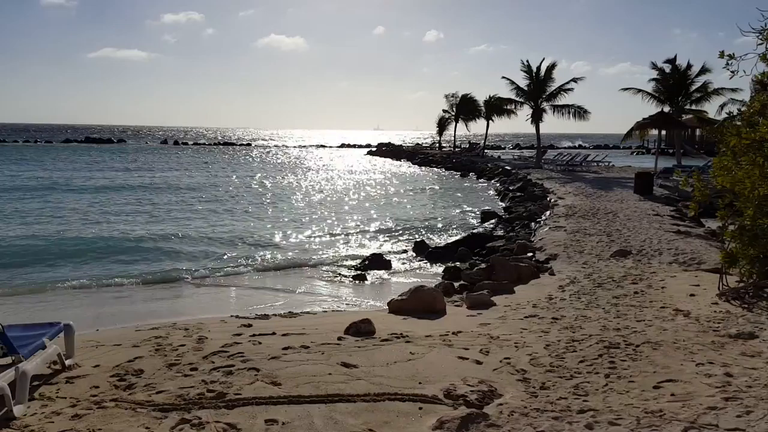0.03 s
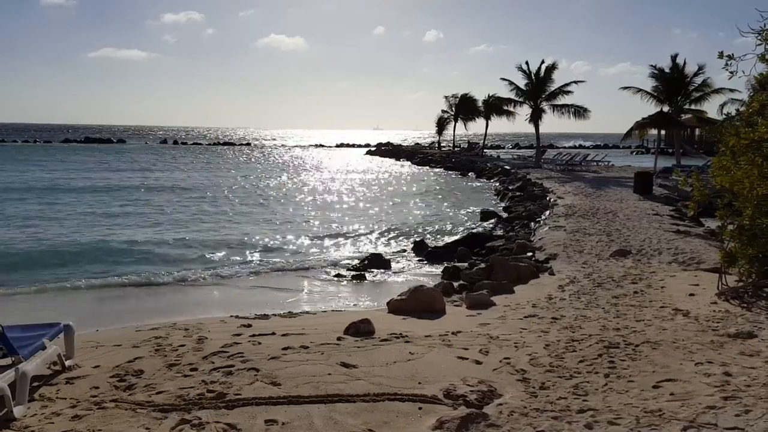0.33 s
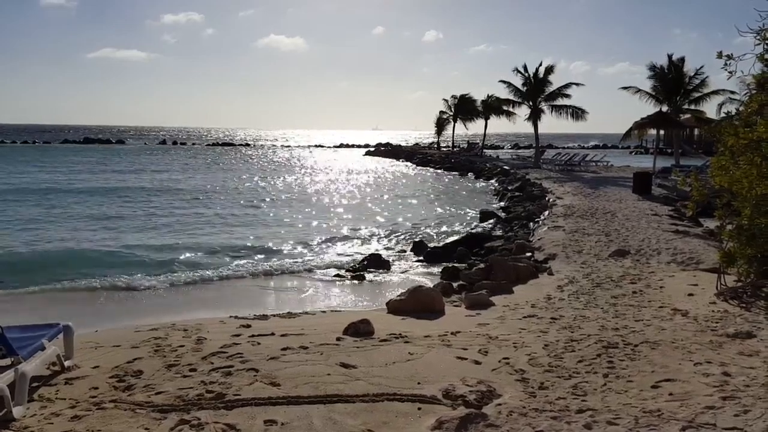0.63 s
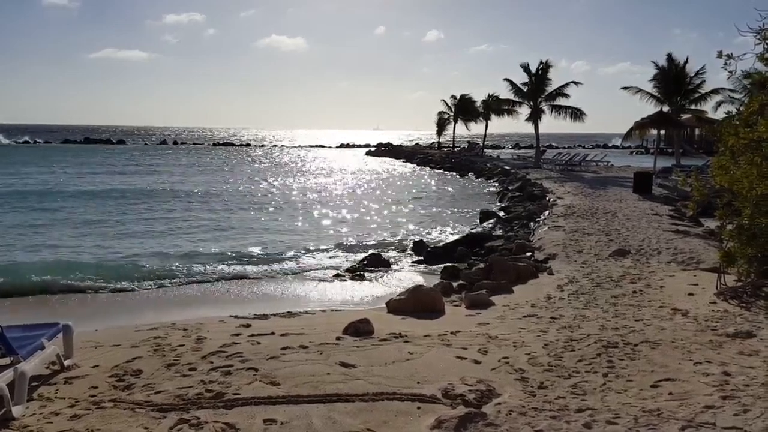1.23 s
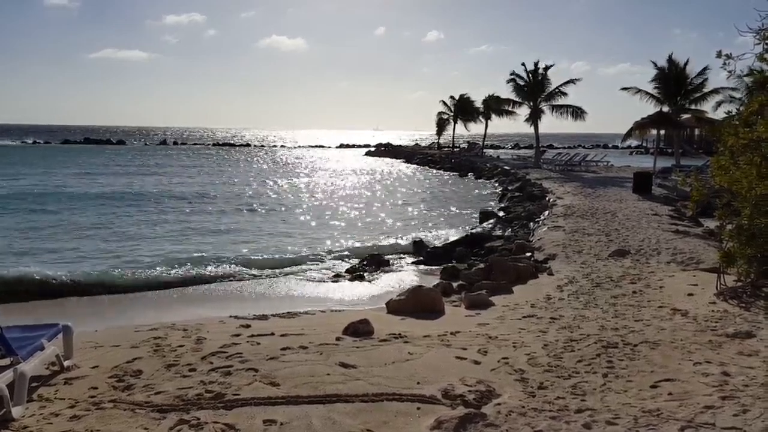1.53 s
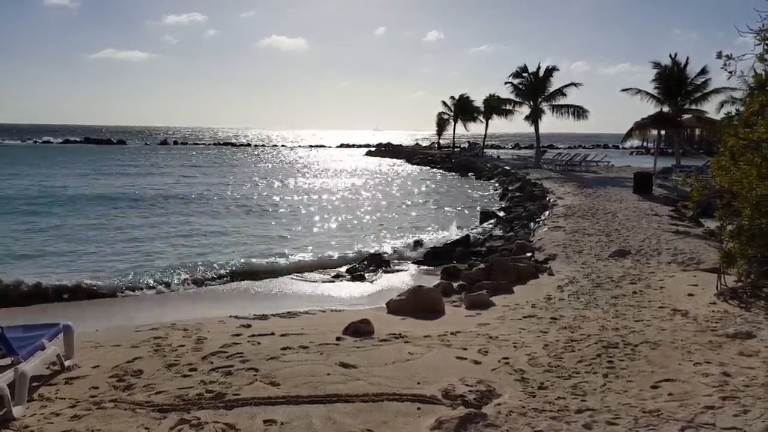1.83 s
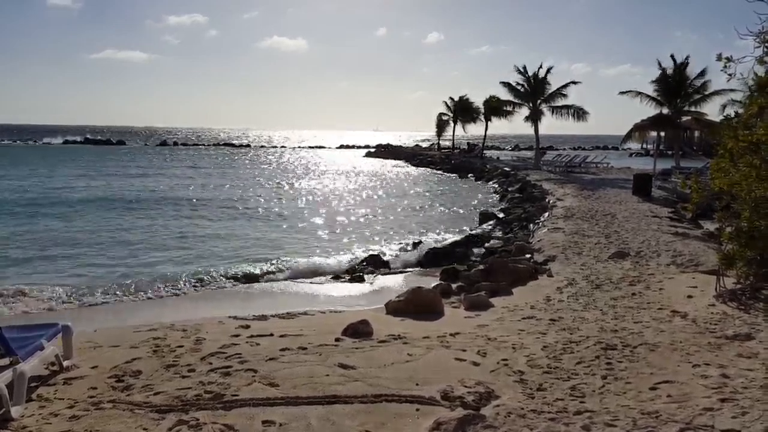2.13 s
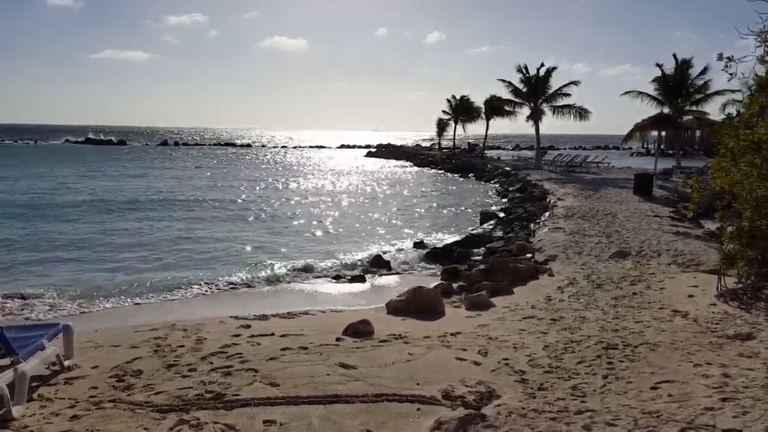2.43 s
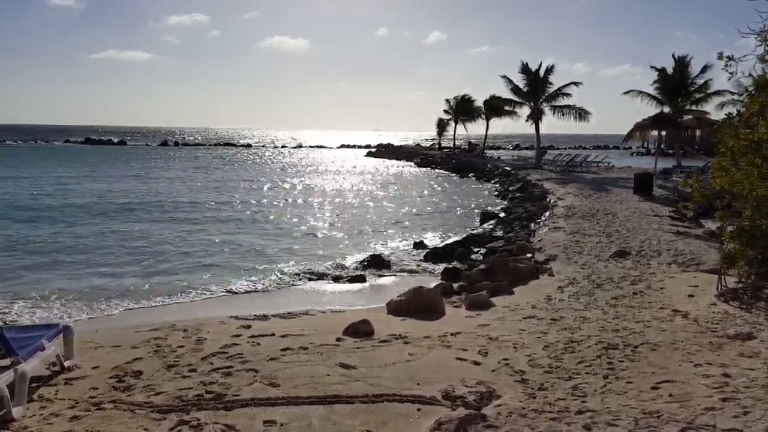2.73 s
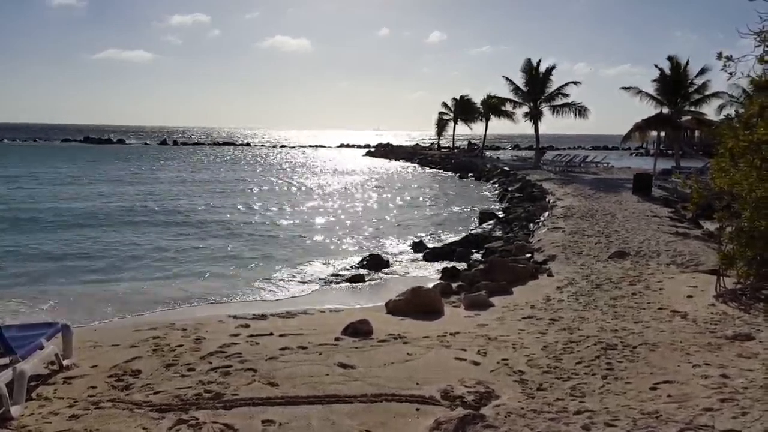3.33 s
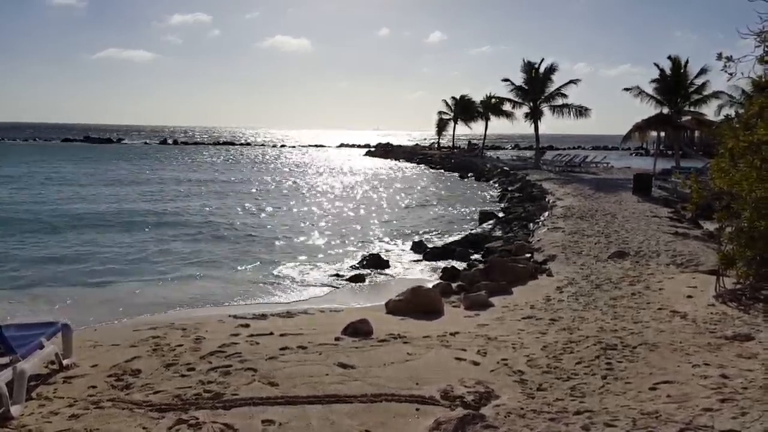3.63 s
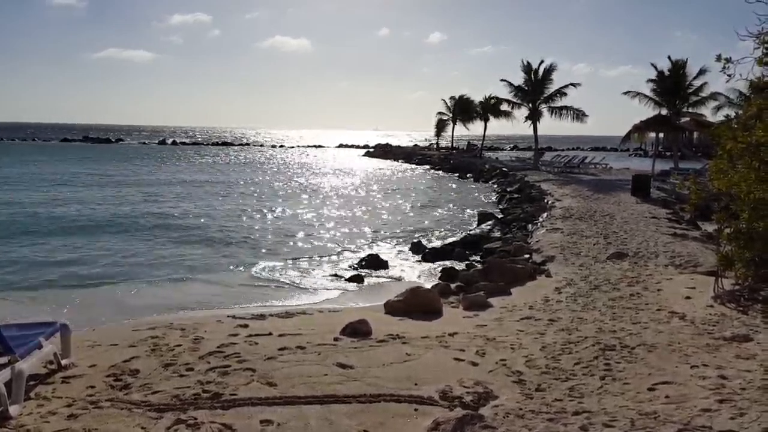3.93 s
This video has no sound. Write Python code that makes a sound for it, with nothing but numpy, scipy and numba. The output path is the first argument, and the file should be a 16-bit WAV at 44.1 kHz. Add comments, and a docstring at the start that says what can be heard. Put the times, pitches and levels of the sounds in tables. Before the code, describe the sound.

A small wave rises, breaks with a splash and gurgle, then fizzes out over a sandy beach. Wind rumbles low on the microphone throughout, and small birds chirp faintly now and then.

```python
"""A small wave rises, breaks and washes up a sandy beach: ringing bubbles over foam hiss.
The crest hisses as it spills, slaps ring trapped air, larger bubbles gurgle, foam fizzes over the sand.
Wind rumbles on the microphone, small birds chirp faintly, and a low tone sags and rises once.
The sound fades in."""
import sys
import numpy as np
from scipy import signal
from scipy.fft import rfft, irfft
from scipy.io import wavfile
from numba import njit

SR = 44100
rng = np.random.default_rng(int(sys.argv[2]) if len(sys.argv) > 2 else 0)


def unload_wav(signal):
    """Save mono or channel-first audio to the path in sys.argv[1] as 16-bit WAV at rate SR, clipped to [-1, 1]."""
    wavfile.write(
        sys.argv[1],
        SR,
        np.round(np.clip(np.atleast_2d(signal).T, -1, 1) * 32767).astype(np.int16),
    )


N = 176400

# Water level per register, before trim: t/s, churn/dB, wash/dB, fizz/dB, spray/dB
WAVE_LEVELS = [(0.6, -39, -37, -46.5, -54.5), (0.8, -39.5, -36.5, -45.5, -54),
               (1.15, -37.5, -34.5, -43.5, -51), (1.45, -36.0, -34.5, -41.5, -48),
               (1.72, -35.5, -32.5, -41.5, -47), (1.8, -34.5, -31.0, -37, -42.5),
               (1.97, -31, -28.5, -38, -42), (2.07, -31.5, -29, -36.5, -41.5),
               (2.12, -32, -30, -40.5, -43.5), (2.25, -32.5, -32, -40, -46.5),
               (2.36, -38.5, -34, -43.0, -48.5), (2.54, -36, -34.5, -43, -50),
               (2.67, -40.5, -38.5, -48.5, -54.0), (3.0, -41, -41.0, -49.5, -56.0),
               (3.45, -41, -43.5, -51, -56.5), (3.8, -40.5, -44.5, -51, -59), (4.0, -39.5, -44, -51, -56.5)]
# Water registers: low/Hz, high/Hz, trim/dB, bubble rate/(1/s), bubbles re hiss/dB, life/cycles, flutter/dB
WAVE_REGISTERS = [(198, 636, -0.2, 600, -12.5, 10.9, 0), (590, 2685, -0.65, 1000, -7.5, 16.2, 0.15),
                  (2516, 7230, 1, 2200, -9, 9.6, 0.93), (6250, 15900, 0.5, 2900, -3.5, 2.5, 0.75)]
# Water spectrum: f/Hz, relative density/dB
WATER_SPECTRUM = [(180, -0.5), (250, -0.5), (360, -0.5), (470, -3), (560, -6.5), (680, -2.5), (850, -0.5),
                  (1000, -1.5), (1150, -4), (1600, -2), (2300, -7.5), (2900, -12.5), (3500, -13.5),
                  (4400, -17), (5500, -21), (7500, -26.5), (10500, -24), (13000, -25.5), (15000, -28.5)]
# Left-right likeness of the water: f/Hz, correlation/1
WATER_CORRELATION = [(150, 0.92), (350, 0.92), (520, 0.47), (850, 0.64), (1050, -0.066), (1250, -0.2),
                     (1750, -0.28), (2350, 0.55), (2800, -0.013), (8000, -0.02)]
# Water balance: f/Hz, left minus right/dB
WATER_BALANCE = [(700, 0), (1000, -0.5), (1900, -6), (2600, -4), (3000, 0), (4000, -1), (6300, -2.5),
                 (7700, 2.5), (9000, 2), (12300, 4.5), (14000, 0)]
# Gusts on the microphone, before trim: t/s, level/dB
WIND_LEVELS = [(.45, -36), (.6, -33.5), (1.0, -35), (1.45, -34.5), (1.75, -32.5), (2.0, -32), (2.25, -35),
               (2.7, -35.5), (3.0, -33), (3.37, -36.5), (3.44, -40), (3.5, -40), (3.59, -33.5),
               (3.78, -37.5), (4.0, -33)]
# Wind spectrum: f/Hz, relative density/dB
WIND_SPECTRUM = [(20, -27), (36, -14.5), (48, -12), (60, 4.5), (76, -1), (100, -0.5), (140, -3), (190, -7),
                 (250, -11), (400, -60)]
# Bird notes: t/s, length/s, start f/Hz, end f/Hz, level/dB, rasp share/1
BIRD_NOTES = [(0.58, 0.07, 7040, 6820, -52, .35), (0.6, 0.047, 7850, 7740, -54, .35),
              (1.508, .07, 7120, 6950, -47, .35), (1.52, .04, 7850, 7780, -49, .35),
              (2.517, .048, 7070, 6950, -49, .35), (2.55, .04, 7880, 7900, -57, .4),
              (2.95, 0.062, 6400, 5800, -55.5, .4), (3.035, 0.058, 5550, 4900, -54, .3),
              (3.62, 0.07, 6930, 7050, -54.5, .25), (3.634, 0.036, 5200, 5220, -56.5, .5),
              (3.645, .06, 7850, 7780, -56, .25), (3.68, 0.045, 3900, 3780, -56, .85),
              (3.726, 0.036, 3520, 3350, -52, .8)]
# Hiss of the spilling crest: t/s, level/dB
CREST_LEVELS = [(0, -80), (.9, -66), (1.25, -50), (1.65, -46), (1.8, -39.5), (2.0, -40), (2.3, -50),
                (2.7, -80)]
# Water slaps: t/s, gain/dB, f/Hz
SLAP_EVENTS = [(1.265, -33.5, 2100), (1.335, -33.5, 860), (1.55, -27, 850), (2.183, -30.5, 885),
               (2.238, -28.5, 950), (2.503, -27, 785), (2.535, -33, 1580), (2.887, -35.5, 860),
               (3.22, -40, 840)]
# Gurgle of the collapsing wave: t/s, level/dB
GURGLE_LEVELS = [(1.85, -66), (2.1, -33), (2.27, -41), (2.4, -41.5), (2.54, -37), (2.7, -47), (3.0, -61),
                 (4.0, -60)]
# Course of the low tone: t/s, f/Hz, level/dB
TONE_COURSE = [(2.27, 133, -50), (2.33, 123, -36.5), (2.42, 118, -35.5), (2.48, 112, -36.5),
               (2.6, 110, -34), (2.72, 112, -35), (2.8, 115, -32), (2.91, 127, -39), (2.98, 133, -40),
               (3.03, 136, -56)]

TIME_S = np.arange(N) / SR
BINS_HZ = np.maximum(np.arange(N // 2 + 1) * SR / N, 1)
SIDES = np.array([[1], [-1]])  # left, right


def undb(db):
    """Decibels to gain."""
    return 10 ** (np.asarray(db) / 20)


def unit(x):
    """Scale to rms 1."""
    return x / np.sqrt(np.mean(x ** 2))


def over_time(table, column=1):
    """One column of a time table at every sample."""
    rows = np.array(table, float)
    return np.interp(TIME_S, rows[:, 0], rows[:, column])


def over_bins(table):
    """A frequency table at every bin."""
    rows = np.array(table, float)
    return np.interp(np.log(BINS_HZ), np.log(rows[:, 0]), rows[:, 1])


def drift(rate_hz):
    """Smooth random motion, rms 1."""
    return unit(irfft(rfft(rng.standard_normal(N)) / (1 + (2 * BINS_HZ / rate_hz) ** 2), N))


def resonance(x, hz, width_hz):
    """Second-order band-pass, output rms 1."""
    return unit(irfft(rfft(x) / (1 + 1j * (BINS_HZ / hz - hz / BINS_HZ) * hz / width_hz), N))


@njit
def ring_bubbles(starts, hz, cycles, amplitude, rise):
    """Each bubble is a damped sine that rises in pitch as it dies."""
    out = np.zeros(N)
    for k in range(len(starts)):
        length, phase = cycles[k] * SR / hz[k], 0.
        for i in range(min(int(length) + 1, N - starts[k])):
            phase += 2 * np.pi * hz[k] / SR * (1 + rise * i / length)
            out[starts[k] + i] += amplitude[k] * np.exp(-5 * i / length) * np.sin(phase)
    return out


def bubbles(low_hz, high_hz, per_s, cycles):
    """Cloud of bubbles with random onset, pitch and life, rms 1."""
    count = int(per_s * N / SR)
    starts = rng.integers(0, N, count)
    hz = rng.uniform(.8 * low_hz, high_hz, count)
    life_cycles = cycles * rng.uniform(.5, 1.5, count)
    amplitude = np.sqrt(hz)  # equal energy at every pitch
    return unit(ring_bubbles(starts, hz, life_cycles, amplitude, rise=.16))


def wave():
    """Bubbles and foam hiss in four registers, surging together, spread along the shore."""
    out = 0
    surge_db = .23 * drift(3.3)
    correlation = over_bins(WATER_CORRELATION)
    colour = undb(over_bins(WATER_SPECTRUM) + SIDES * over_bins(WATER_BALANCE) / 2)
    for k, (low_hz, high_hz, trim_db, per_s, bubble_db, cycles, flutter_db) in enumerate(WAVE_REGISTERS):
        mid, side = (rfft(rng.standard_normal(N) + undb(bubble_db) * bubbles(low_hz, high_hz, per_s, cycles))
                     for _ in range(2))
        stereo = mid * np.sqrt(1 + correlation) + SIDES * side * np.sqrt(1 - correlation)
        band = 1 / np.sqrt((1 + (low_hz / BINS_HZ) ** 12) * (1 + (BINS_HZ / high_hz) ** 12))
        water = irfft(stereo * colour * band, N)
        level_db = over_time(WAVE_LEVELS, column=k + 1) + trim_db + surge_db + flutter_db * drift(35)
        out = out + water / np.std(water.mean(0)) * undb(level_db)
    return out


def wind(trim_db=-.5, side_db=-16.5, buffet_db=.25):
    """Wind buffets the microphone: a rumble, nearly alike left and right."""
    colour = undb(over_bins(WIND_SPECTRUM))
    mid, side = (unit(irfft(rfft(rng.standard_normal(N)) * colour, N)) for _ in range(2))
    level_db = over_time(WIND_LEVELS) + trim_db + buffet_db * drift(33)
    return (mid + undb(side_db) * side * SIDES) * undb(level_db)


def birds(rasp_hz=420, echo_db=-7, echo_decay_s=.035, pan_left_db=2):
    """Thin gliding notes, part whistle, part rasp, with a short scatter from the bushes."""
    song = 0
    waver = 1 + .005 * drift(186)
    grit = (drift(rasp_hz) + 1j * drift(rasp_hz)) / np.sqrt(2)
    for start_s, length_s, from_hz, to_hz, level_db, rasp in BIRD_NOTES:
        progress = np.clip((TIME_S - start_s) / length_s, 0, 1)
        hz = (from_hz + (to_hz - from_hz) * progress) * waver
        note = (np.sqrt(1 - rasp) + np.sqrt(rasp) * grit) * np.exp(2j * np.pi * np.cumsum(hz) / SR)
        song = song + undb(level_db) * np.sqrt(2) * np.sin(np.pi * progress) * note.imag
    tail = rng.standard_normal((2, N)) * np.exp(-TIME_S / echo_decay_s)
    echo = signal.fftconvolve(song[None], unit(tail) / np.sqrt(N), axes=1)[:, :N]
    return (song + undb(echo_db) * echo) * undb(SIDES * pan_left_db / 2)


def crest(hz=4430, stage_width_hz=1350):
    """Smooth hiss that grows as the lip of the wave spills and dies once it has fallen."""
    hiss = [resonance(resonance(noise, hz, stage_width_hz), hz, stage_width_hz)
            for noise in rng.standard_normal((2, N))]
    return np.array(hiss) * undb(over_time(CREST_LEVELS))


def slaps(attack_s=.0058, decay_s=.027, width_hz=150):
    """Each slap of water traps air that rings briefly."""
    out = 0
    for start_s, gain_db, hz in SLAP_EVENTS:
        age_s = np.maximum(TIME_S - start_s, 0)
        envelope = (1 - np.exp(-age_s / attack_s)) * np.exp(-age_s / decay_s)
        air = resonance(rng.standard_normal(N), hz, width_hz)
        out = out + air * undb(gain_db) * envelope
    return out


def gurgle(hz=833, width_hz=189):
    """Larger bubbles ring near one pitch as the water tumbles onto the sand."""
    cloud = bubbles(hz - width_hz, hz + width_hz, per_s=350, cycles=22)
    return resonance(cloud, hz, width_hz) * undb(over_time(GURGLE_LEVELS))


def low_tone(waver=.007, flutter_db=.7):
    """Soft hollow tone, perhaps wind across an opening; the pitch sags and rises."""
    hz = over_time(TONE_COURSE) * (1 + waver * drift(35))
    level_db = over_time(TONE_COURSE, column=2) + flutter_db * drift(25)
    gate = (TIME_S > TONE_COURSE[0][0]) & (TIME_S < TONE_COURSE[-1][0])
    return np.sqrt(2) * np.sin(2 * np.pi * np.cumsum(hz) / SR) * undb(level_db) * gate


def swash(peak_s=2.864, sigma_s=.078, peak_db=-46):
    """Foam runs out over the sand: a short, wide swell of fizzing bubbles."""
    swell = undb(peak_db) * np.exp(-.5 * ((TIME_S - peak_s) / sigma_s) ** 2)
    clouds = [bubbles(low_hz=1800, high_hz=6500, per_s=3000, cycles=6.7) for _ in range(2)]
    return swell * np.array([resonance(cloud, hz=3580, width_hz=2600) for cloud in clouds])


def scene():
    """The shore, in stereo."""
    return wave() + wind() + birds() + crest() + slaps() + gurgle() + low_tone() + swash()


def record(dry, silence_s=.37, fade_s=.29, cutoff_hz=15400):
    """Silence, short fade-in, steep low-pass."""
    fade = np.clip((TIME_S - silence_s) / fade_s, 0, 1) ** .92
    lowpass = signal.ellip(10, .2, 80, cutoff_hz, fs=SR, output="sos")
    return signal.sosfilt(lowpass, dry * fade)


dry = scene()
out = record(dry)
unload_wav(out)
```